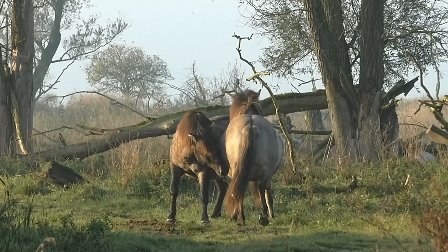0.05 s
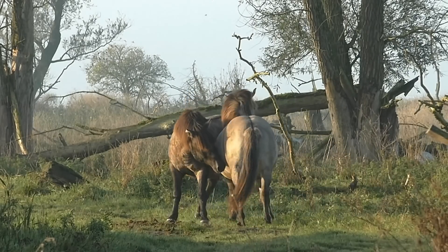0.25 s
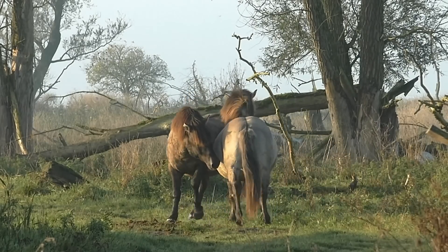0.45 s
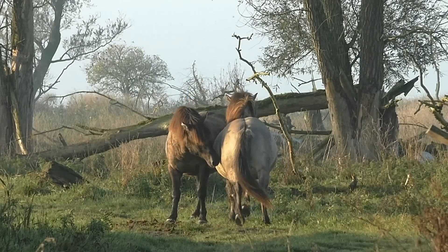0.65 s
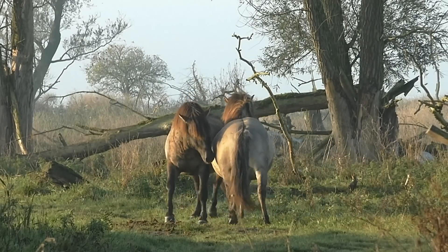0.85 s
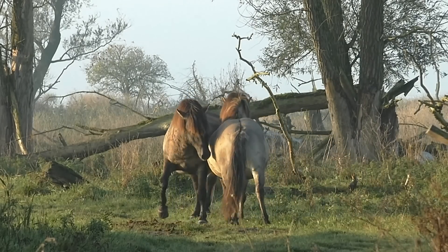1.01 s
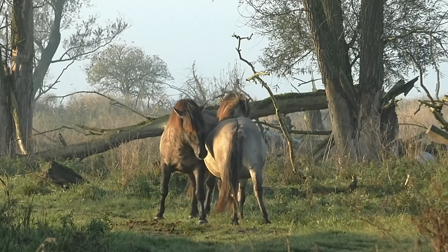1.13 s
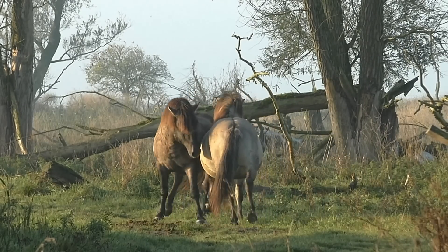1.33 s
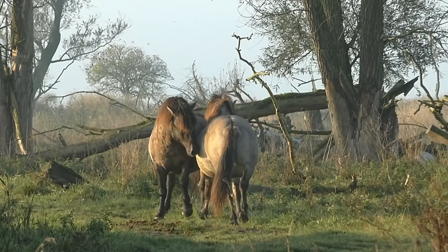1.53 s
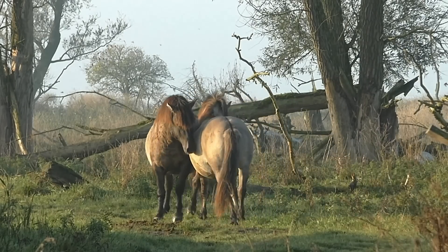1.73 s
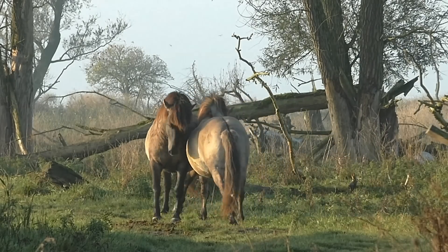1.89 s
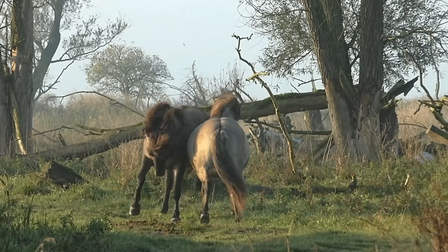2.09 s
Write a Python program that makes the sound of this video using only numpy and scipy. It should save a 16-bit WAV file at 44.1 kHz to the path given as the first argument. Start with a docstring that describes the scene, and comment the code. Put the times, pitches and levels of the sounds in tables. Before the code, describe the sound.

In a meadow, a horse lets out a short, high, hoarse squeal in the centre, just after faint twig snaps and swishing grass. A few dull hoof thuds, far geese and thin bird chirps continue over low rumble and microphone hiss.

```python
"""A horse's short squeal as two horses spar in a meadow: a high arching tone breaks into a slowing rasp,
made by a slower beat of the vocal folds whose pulses and puffs of breath ring the throat.
Hooves thud softly on the turf, twigs snap and grass swishes round the legs; the trees give an echo.
Geese yelp far off to the right and small birds whistle.
Behind it all lie a low distant rumble, the drone of a far engine and microphone hiss."""
import sys
import numpy as np
from scipy import signal
from scipy.fft import rfft, irfft
from scipy.io import wavfile
from scipy.ndimage import uniform_filter1d

SR = 44100
rng = np.random.default_rng(int(sys.argv[2]) if len(sys.argv) > 2 else 0)


def digitize_waveform(pressure):
    """Quantize a signal to 16-bit integers and store it at the path in sys.argv[1].

    Rows of a 2-D input are taken as channels; values are limited to [-1, 1].
    """
    field = np.atleast_2d(pressure).T
    bounded = np.clip(field, -1, 1)
    quanta = np.round(bounded * 32767).astype(np.int16)
    wavfile.write(sys.argv[1], SR, quanta)


N = 94815
T = np.arange(N) / SR

# noise colours of rumble, hiss, distant flock, grass and twigs: f/Hz, relative level/dB
RUMBLE_EQ = [(20, -25), (40, -29), (58, -8), (76, 6.5), (110, -8.5), (170, -5), (290, -3.5), (360, 1),
             (450, -2), (510, -15.5), (570, -39.5), (700, -15), (900, -32.5), (2000, -34.5), (16000, -91)]
HISS_EQ = [(100, 1), (2000, -9), (4500, -2), (7000, -3.5), (8500, -2), (9600, 3.5), (12000, 2), (15500, -1)]
FLOCK_EQ = [(300, 9), (800, -13), (1100, 8.5), (1550, 1), (2100, -1), (2900, -6.5), (4000, -12),
            (7000, -34), (16000, -81)]
GRASS_EQ = [(300, -23), (1500, 5), (3000, -7), (6000, -3), (10000, -23), (16000, -24)]
TWIG_EQ = [(500, -20), (3000, 10.5), (6000, -6), (10000, 11), (13000, 0), (16000, -18)]
# decay of the echo among the trees: f/Hz, base t60/s
TREE_DECAY = [(200, 1), (2500, 0.35), (8000, 0.28)]
# far geese: t/s, length/s, f/Hz, glide/octaves, level/dB, second partial/dB, left minus right/dB
GOOSE_YELPS = [(0.48, 0.071, 1660, 0.141, -57, -18, -5), (0.553, .06, 1635, 0.094, -58, -19, -4),
               (0.558, 0.042, 1450, 0.067, -52, -19, -14), (.63, 0.073, 2130, -0.069, -66, -27, 2),
               (0.738, 0.078, 1723, -0.085, -60.5, -30, -2), (0.769, 0.084, 1380, -.03, -59, -31, -24),
               (0.946, 0.085, 1411, 0.23, -53.5, -9.5, -12), (1.059, 0.052, 1603, 0.062, -60, -10, -10),
               (1.02, 0.12, 1363, -0.095, -58, -10, -9), (1.124, 0.072, 1434, .12, -50.5, -10.5, -9),
               (1.161, 0.049, 2040, -.08, -63.5, -10, -11), (1.222, 0.043, 1700, -0.057, -57, -13, -26),
               (1.309, 0.072, 1559, 0.13, -54.5, -20, -5), (1.422, 0.109, 1395, -0.13, -56, -10.5, -6),
               (1.527, .1, 1396, -0.094, -63.5, -12, 6.5), (1.675, 0.056, 1615, 0.15, -52, -28, -7),
               (1.692, 0.046, 1390, -0.11, -55, -14, -6), (1.701, 0.051, 1746, -0.053, -51, -28, -28),
               (1.895, 0.062, 1649, -0.18, -55.5, -25, -8), (1.93, 0.064, 1481, -0.048, -49.5, -23, -13)]
# small birds: t/s, length/s, f/Hz, glide/octaves, level/dB, waver/share of pitch
BIRD_NOTES = [(0.049, 0.081, 5470, 0, -62, 0.0037), (0.694, .05, 8000, -.08, -77, .008),
              (0.983, 0.11, 6840, -0.16, -73, .025), (.745, 0.073, 4500, -.12, -76, 0.018),
              (1.275, 0.075, 5420, .08, -75.5, .015), (1.6, 0.035, 4920, -0.041, -76, 0.0071),
              (1.69, .06, 5280, -0.017, -77, 0.028), (1.029, 0.067, 4740, -0.075, -68, 0.068),
              (1.125, 0.077, 4490, 0.055, -66, 0.027), (1.544, 0.048, 4130, -0.057, -69, 0.0033),
              (1.71, 0.034, 4170, 0.099, -68, .008), (2.019, 0.082, 4360, 0.022, -66.5, 0.065)]
# grass round the legs: centre t/s, half length/s, level/dB
GRASS_SWISHES = [(0.038, 0.052, -63.5), (0.21, 0.078, -63), (1.09, 0.27, -75.5)]
# twigs breaking: t/s, relative level/dB
TWIG_SNAPS = [(0.1467, -48.5), (0.1499, -51), (0.1639, -51), (0.1671, -53), (1.78, -61)]
# hooves on the turf: t/s, level/dB, f/Hz
HOOF_THUDS = [(0.192, -50.5, 300), (0.438, -43.5, 184), (.485, -55.5, 148), (1.071, -59.5, 155),
              (1.952, -58, 73.6)]
# arch of the squeal's high tone: t/s, f/Hz, level/dB before the throat EQ
SQUEAL_ARCH = [(.18, 1120, -74), (.2, 1235, -57.5), (.222, 1365, -58), (.25, 1467, -46.5),
               (.282, 1546, -34), (.315, 1516, -35.5), (.352, 1477, -40.5), (.372, 1405, -39),
               (.4, 1300, -39.5), (.42, 1241, -39.5), (.44, 1259, -37.5), (.462, 1301, -56)]
# how the throat passes the partials of that tone: f/Hz, level/dB
THROAT_EQ = [(1100, -51), (1300, -12), (1550, -17), (2400, 2.5), (3100, -3), (3800, -16), (4200, -16),
             (4550, -10), (4750, -22.5), (5300, -45), (6200, -35), (7600, -32.5), (9500, -29.5)]
# slower beat of the vocal folds: t/s, tone cycles per beat, rasp level/dB, breathy share/0-1
FOLD_BEAT = [(0.178, 1.88, -79, 0.6), (.222, 1.71, -51.5, 1), (.245, 2.08, -44, 0), (.265, 2.9, -46, 0.05),
             (0.287, 3.17, -45, 0.2), (0.319, 3, -38.5, 0.6), (0.362, 3, -42.5, 0.33),
             (.39, 2.98, -40, 0.2), (.42, 3.3, -39, 0), (.44, 5, -41, .25), (.456, 8.6, -40.5, 0),
             (.478, 10.7, -61, 0.73)]
# throat resonances with the mouth open: f/Hz, width/Hz, relative level/dB
FORMANTS = [(410, 84, -4), (1460, 120, -1), (2200, 520, -1.5), (2544, 390, 1.5), (3010, 430, 1),
            (3695, 510, 1.5), (4760, 270, -14), (5860, 1100, -14.5)]

FLOCK_LAG_S = 0.00043  # the geese reach the left side later


def amp(db):
    """Decibels to gain."""
    return 10 ** (np.asarray(db) / 20)


def unit(x):
    """Scales to rms 1."""
    return x / np.sqrt(np.mean(x ** 2) + 1e-20)


def read(points, hz):
    """Reads a table on a log-frequency axis."""
    f, value = np.transpose(points)
    return np.interp(np.log(hz + 1), np.log(f), value)


def automation(rows):
    """Value and gain of a breakpoint curve at every sample; silent outside it."""
    s, value, db = np.transpose(rows)
    return np.interp(T, s, value), amp(np.interp(T, s, db)) * (T > s[0]) * (T < s[-1])


def add(mix, s, sound):
    """Drops a sound into the mix at s seconds."""
    part = mix[..., round(s * SR):][..., :sound.shape[-1]]
    part += sound[..., :part.shape[-1]]


def colour(x, eq):
    """Shapes a sound with an EQ curve."""
    return irfft(rfft(x) * amp(read(eq, np.fft.rfftfreq(len(x), 1 / SR))), len(x))


def wander(hz):
    """Smooth random modulation of rms 1, rolling off above hz."""
    rolloff = np.exp(-(np.fft.rfftfreq(N, 1 / SR) / hz) ** 2)
    return unit(irfft(rfft(rng.standard_normal(N)) * rolloff, N))


def resonate(x, hz, width_hz):
    """A steep resonance whose centre can sweep."""
    turn = np.exp(2j * np.pi * np.cumsum(hz * np.ones(N)) / SR)
    r = np.exp(-np.pi * width_hz / SR)
    return 2 * (turn * signal.lfilter([(1 - r) ** 2], [1, -2 * r, r * r], x / turn + 1e-18)).real


def note(length, hz, glide, waver):
    """Phase and envelope of one gliding, wavering note."""
    u = np.linspace(0, 1, round(length * SR))
    pitch = hz * 2 ** (glide * (u - .5)) * (1 + waver * wander(415)[:len(u)])
    return 2 * np.pi * np.cumsum(pitch) / SR, np.sqrt(2) * np.sin(np.pi * u)


def echo(x, t60_scale):
    """Scatter from ground and trunks: sparse taps that die faster in the treble."""
    size = SR // 2
    taps = rng.standard_normal(size) * (rng.random(size) < .1) * (np.arange(size) > SR * .003)
    hz, t, spectra = signal.stft(taps, SR, nperseg=256)
    t60 = t60_scale * read(TREE_DECAY, hz)[:, None]
    tail = signal.istft(spectra * amp(-60 * t / t60), SR, nperseg=256)[1]
    return signal.fftconvolve(x, tail / np.linalg.norm(tail))[:N]


def bed(eq, coherence, patchy_db, lag_s=0):
    """Steady stereo noise with drifting patches in time and frequency."""
    hz = np.fft.rfftfreq(2048, 1 / SR)
    a, b, c, d, patches = rng.standard_normal((5, N // 512 + 5, len(hz)))
    patches = unit(uniform_filter1d(uniform_filter1d(patches, size=6, axis=0), size=7, axis=1))
    common, separate = a + 1j * b, c + 1j * d
    left = common * np.exp(-2j * np.pi * hz * lag_s)
    right = coherence * common + np.sqrt(1 - coherence ** 2) * separate
    spectra = np.array([left, right]) * amp(read(eq, hz) + patchy_db * patches)
    return unit(signal.istft(spectra, nperseg=2048, noverlap=1536, time_axis=1, freq_axis=2)[1][:, :N])


def rumble_and_hiss():
    """The noise floor: low distant rumble, with microphone hiss dead centre."""
    rumble = amp(-54) * bed(RUMBLE_EQ, coherence=.89, patchy_db=1.5)
    return rumble + amp(-66) * bed(HISS_EQ, coherence=1, patchy_db=0.9)


def far_engine():
    """A low drone: noise through one narrow resonance."""
    return amp(-62) * unit(resonate(rng.standard_normal(N), hz=75.3, width_hz=6.6))


def flock():
    """The whole flock of geese blurred into a wide wash, leaning right."""
    left_db, right_db = -59, -57
    return amp([[left_db], [right_db]]) * bed(FLOCK_EQ, coherence=0.41, patchy_db=4.5, lag_s=FLOCK_LAG_S)


def geese():
    """Hoarse far yelps, mostly on the right: three partials roughened by a fast flutter."""
    out = np.zeros((2, N))
    for s, length, hz, glide, db, second_db, left_db in GOOSE_YELPS:
        phase, swell = note(length, hz, glide, waver=0.012)
        yelp = np.sin(phase) + amp(second_db) * (np.sin(2 * phase) + amp(-10) * np.sin(3 * phase))
        flutter = 1 + 0.57 * wander(670)[:len(phase)]
        yelp *= amp(db) * swell * flutter
        add(out[0], s + FLOCK_LAG_S, yelp * amp(left_db))
        add(out[1], s, yelp)
    return out + amp(-7.5) * np.array([echo(side, t60_scale=1.5) for side in out])


def birds():
    """Thin whistles and buzzy chips: wavering sine glides with a light echo."""
    out = np.zeros(N)
    for s, length, hz, glide, db, waver in BIRD_NOTES:
        phase, swell = note(length, hz, glide, waver)
        add(out, s, amp(db) * swell * np.sin(phase))
    return out + amp(-13.5) * echo(out, t60_scale=1)


def grass():
    """Soft uneven swishes as the legs brush through."""
    swells = sum(amp(db) * np.exp(-((T - s) / half) ** 2) for s, half, db in GRASS_SWISHES)
    return swells * (1 + 0.34 * wander(90)) * unit(colour(rng.standard_normal(N), GRASS_EQ))


def twigs(attack_s=0.0012):
    """Dry stems crack in tiny bright bursts of noise."""
    envelope = np.zeros(N)
    u = T[:SR // 20] / attack_s
    for s, db in TWIG_SNAPS:
        add(envelope, s, 0.75 * amp(db) * u * np.exp(2 - 2 * u))
    return envelope * unit(colour(rng.standard_normal(N), TWIG_EQ))


def hooves(attack_s=0.014):
    """Dull thuds on turf: low bands of noise with a soft attack."""
    out = np.zeros(N)
    for s, db, hz in HOOF_THUDS:
        u = np.maximum(T - s, 0) / attack_s
        out += amp(db) * u * np.exp(1 - u) * unit(resonate(rng.standard_normal(N), hz, width_hz=195))
    return out


def high_tone(pitch, beats, bend_rad=0.12, swing=0.12, shimmer=0.17):
    """Six shimmering partials, their phase and level rocked by the beat of the folds."""
    beat = np.cos(2 * np.pi * beats)
    phase = 2 * np.pi * np.cumsum(pitch) / SR + bend_rad * beat
    tone = sum(amp(read(THROAT_EQ, k * pitch)) * np.cos(k * phase) * (1 + shimmer * wander(150))
               for k in range(1, 7))
    return np.sqrt(2) * tone * (1 + swing * beat)


def throat(drive, closing_s=0.38, sag_per_s=0.98):
    """The throat rings at its formants, which sink as the mouth closes."""
    mouth = 1 - sag_per_s * np.clip(T - closing_s, 0, FOLD_BEAT[-1][0] - closing_s)
    return unit(sum((-1) ** k * amp(db) * resonate(drive, hz * mouth, width)
                    for k, (hz, width, db) in enumerate(FORMANTS)))


def squeal(tone_jitter=0.0076, fold_jitter=.012, puff_beats=0.45, leak=0.24):
    """A high tone locked to a slower fold beat, whose pulses and puffs slow to a rattle."""
    folds = np.array(FOLD_BEAT)
    pitch, tone_gain = automation(SQUEAL_ARCH)
    cycles_per_beat, rasp_gain = automation(folds[:, :3])
    breathy = np.interp(T, folds[:, 0], folds[:, 3])
    pitch *= 1 + tone_jitter * wander(350)
    beat_hz = pitch / cycles_per_beat
    beats = np.cumsum(beat_hz * (1 + fold_jitter * wander(200))) / SR
    tone = tone_gain * high_tone(pitch, beats)
    # each beat fires one uneven pulse and lets out a puff of breath
    pulses = np.diff(np.floor(beats), prepend=0) * np.sqrt(SR / beat_hz) * (1 + 0.37 * wander(390))
    puffs = unit(leak + np.exp(-(beats % 1) / puff_beats))
    drive = (1 - breathy) * pulses + breathy * puffs * rng.standard_normal(N)
    rasp = rasp_gain * throat(drive / np.hypot(1 - breathy, breathy))
    # bright air rides on both voices
    air = unit(colour(puffs * rng.standard_normal(N), [(500, -4), (6000, -5.5), (10000, -2.5), (15000, -12)]))
    return tone + rasp + amp(-20) * air * np.hypot(rasp_gain, 0.57 * tone_gain)


def scene():
    """The horses in the centre, the geese to the right, the ambience behind."""
    horses = squeal() + twigs() + grass()
    horses += amp(-10) * echo(horses, t60_scale=0.14)  # early reflections
    centre_tail = echo(horses, t60_scale=0.88)
    side_tails = np.array([echo(horses, t60_scale=0.47), echo(horses, t60_scale=0.71)])
    trees = amp(-13.5) * (centre_tail + 0.12 * side_tails)
    return horses + trees + hooves() + geese() + birds() + flock() + rumble_and_hiss() + far_engine()


def record(dry):
    """A steep high cut takes the very top off the mix."""
    high_cut = signal.firwin(511, 15650, window=("kaiser", 9), fs=SR)
    return signal.oaconvolve(dry, high_cut[None], "same")


dry = scene()
out = record(dry)
digitize_waveform(out)
```